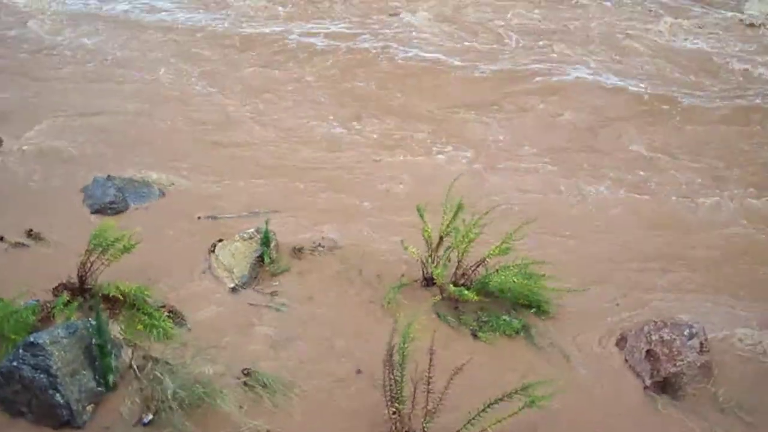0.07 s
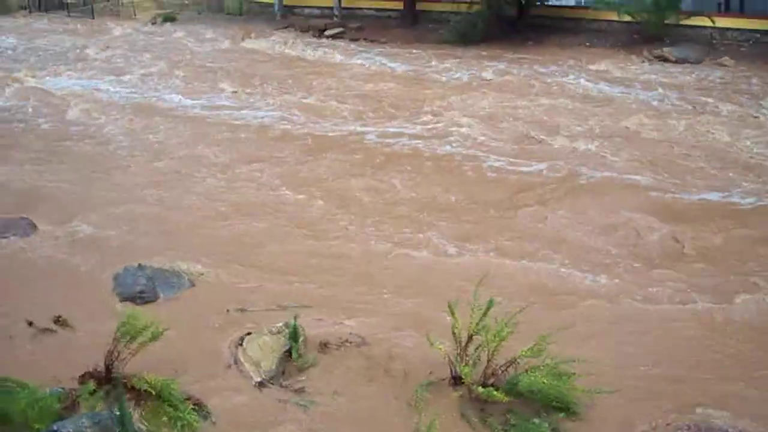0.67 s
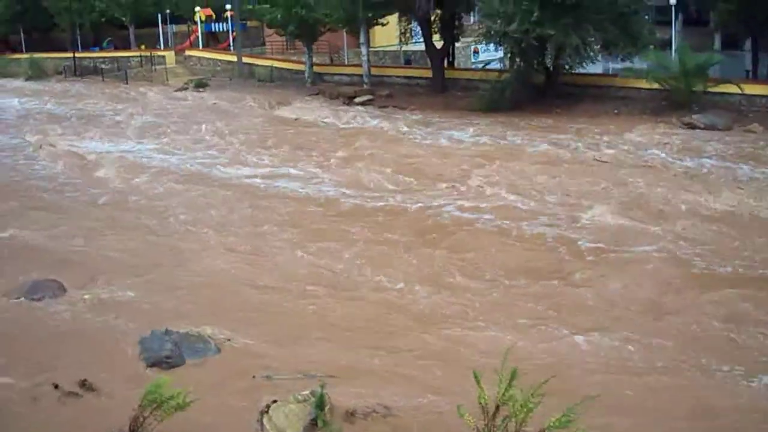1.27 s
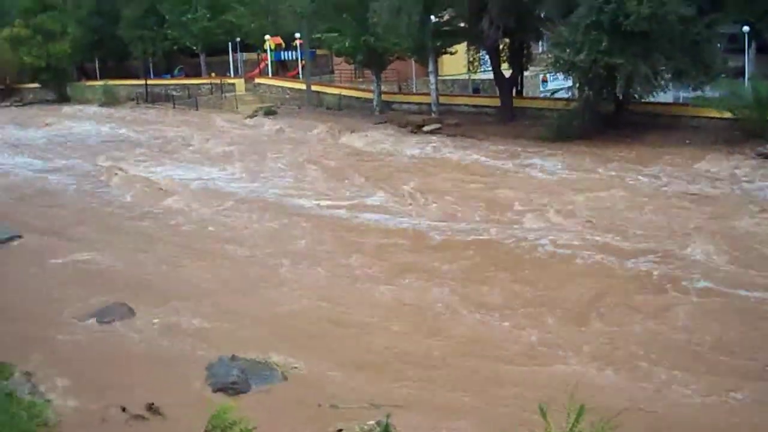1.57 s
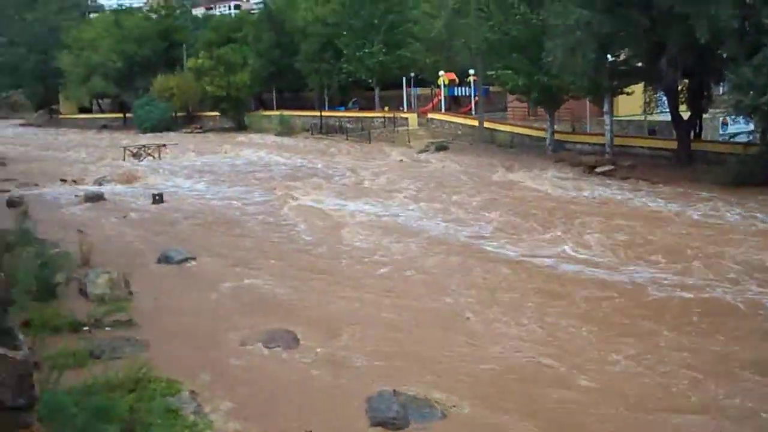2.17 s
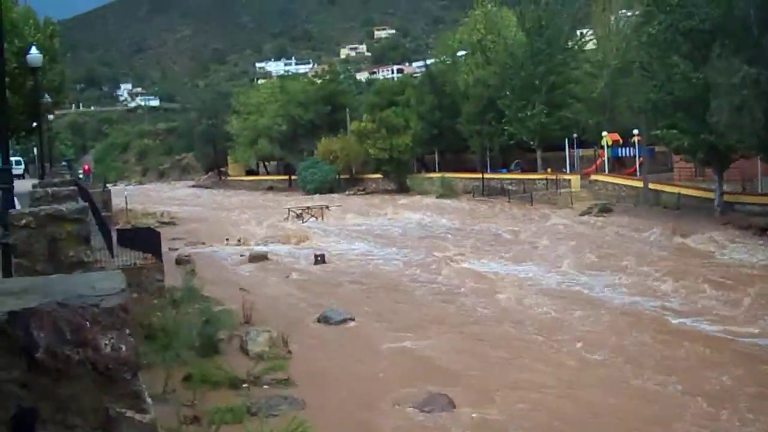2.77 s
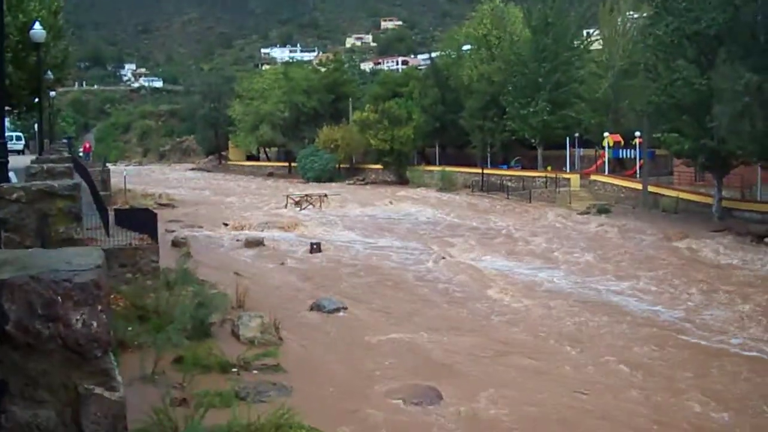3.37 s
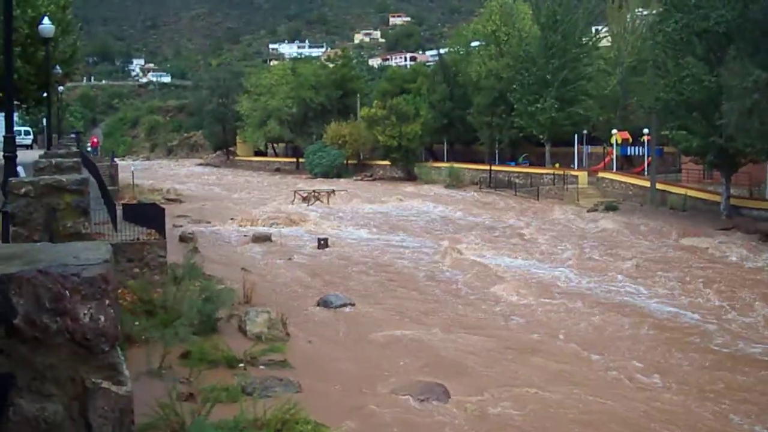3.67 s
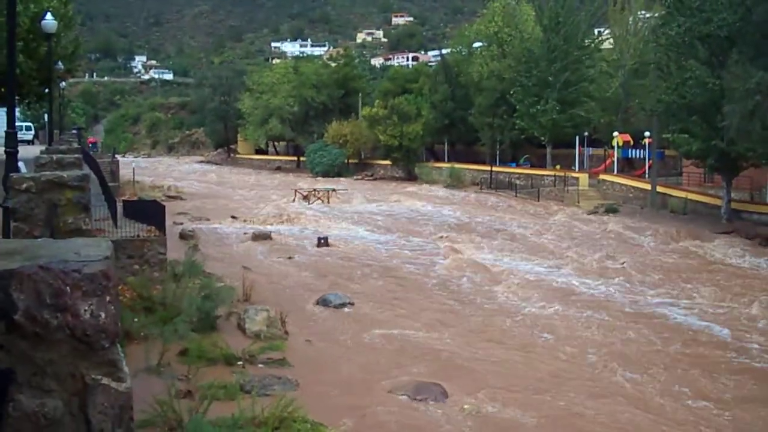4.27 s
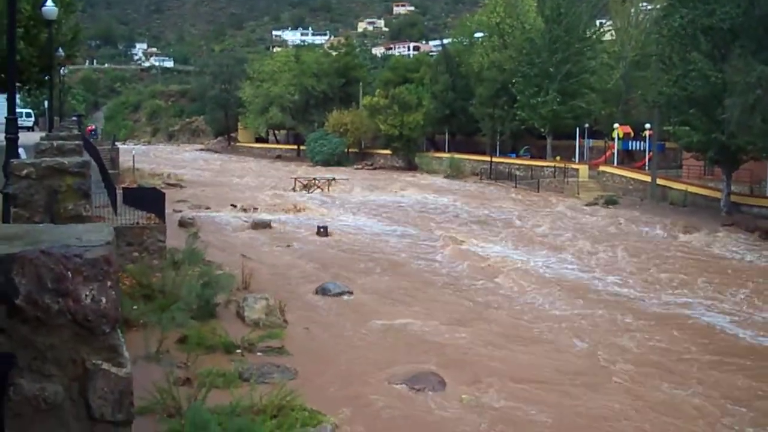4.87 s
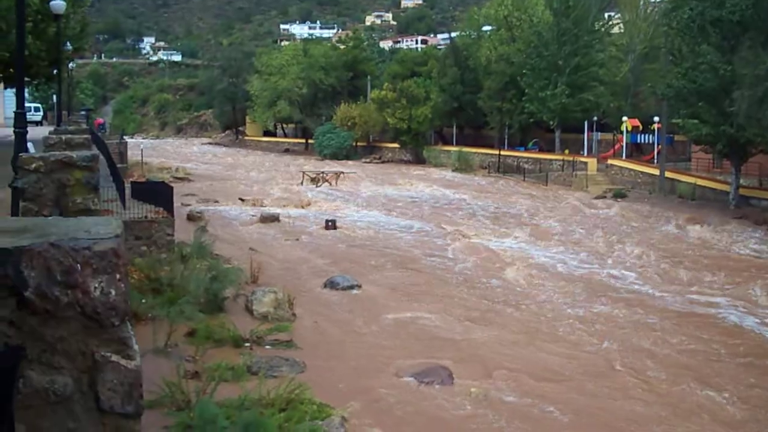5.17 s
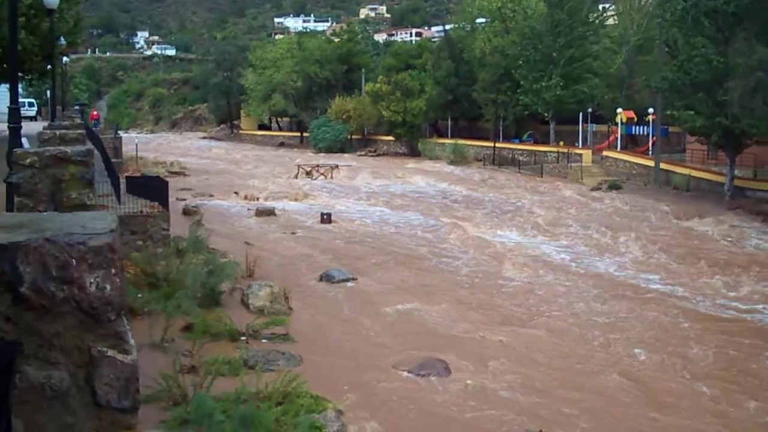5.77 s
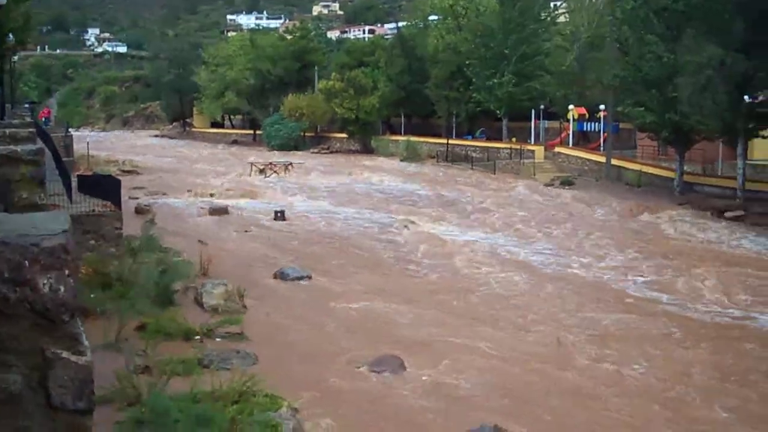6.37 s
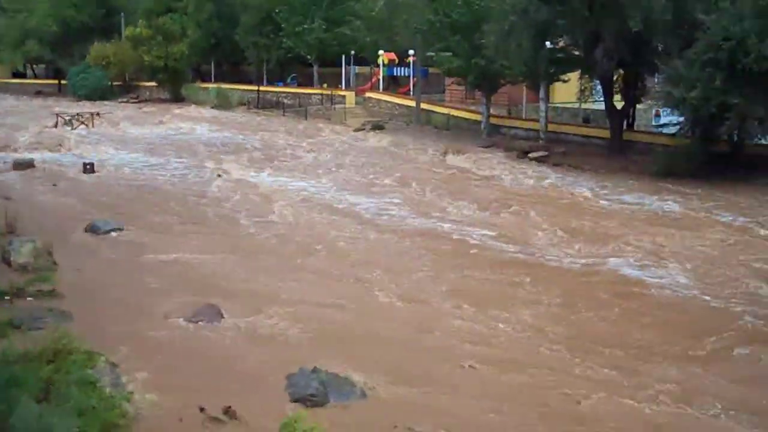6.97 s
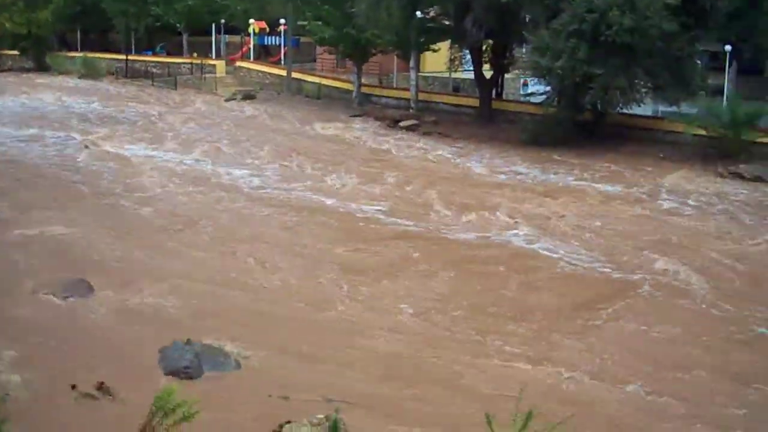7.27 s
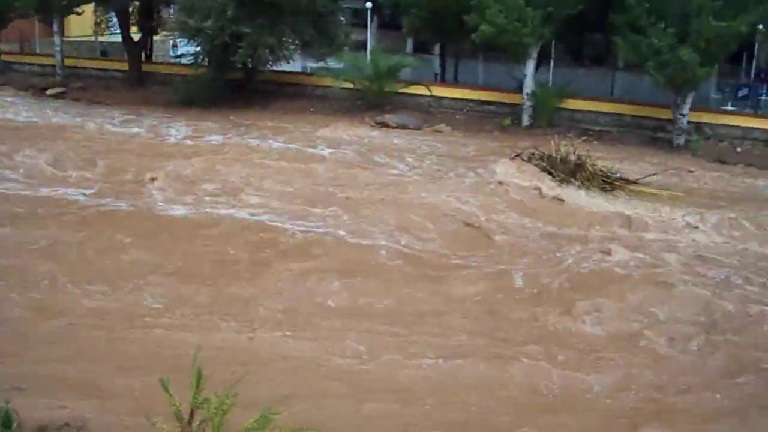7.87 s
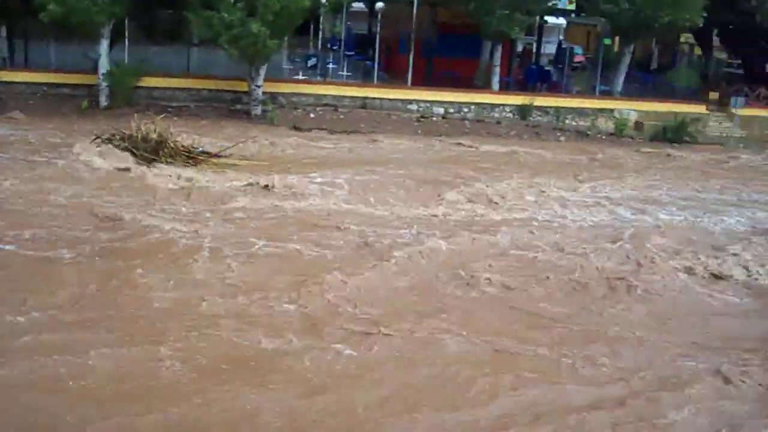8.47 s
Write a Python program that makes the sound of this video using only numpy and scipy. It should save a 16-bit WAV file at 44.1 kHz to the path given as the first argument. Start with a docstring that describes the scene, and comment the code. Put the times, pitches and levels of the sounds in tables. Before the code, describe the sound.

Heard from the bank, fast floodwater churns in one continuous wash with a faint gurgle. Gusts of wind add a low rumble and scattered dull thumps on the microphone. The buffeting grows stronger past the middle, and the river ducks for an instant after the biggest hits. The water's hiss brightens toward the end as the microphone faces the rapids.

```python
"""River in flood, with wind

Countless ringing bubbles merge into a steady roar, brighter when the microphone faces the rapids.
Wind rumbles on the microphone and single eddies thump against it.
The strongest eddies drive the limiter, so the river ducks and swells back."""
import sys
import numpy as np
from scipy import signal
from scipy.fft import rfft, irfft, next_fast_len
from scipy.io import wavfile

SR = 44100
rng = np.random.default_rng(int(sys.argv[2]) if len(sys.argv) > 2 else 0)


def generate_wav(sig):
    """Save sig (samples, or channels by samples) to the path in sys.argv[1] as 16-bit PCM at SR."""
    pcm = np.round(np.clip(np.atleast_2d(sig).T, -1, 1) * 32767).astype(np.int16)
    wavfile.write(sys.argv[1], SR, pcm)


N = 380583

# wind rumble: (frequency [Hz], relative density [dB])
RUMBLE_SPECTRUM = [(4, -17.5), (12, 6), (25, -0.5), (42, -3.5), (65, -9), (100, -18.5), (200, -27),
                   (400, -40), (1500, -79)]
# gusts: (peak time [s], level [dB], 1/e half-width of power [s])
WIND_GUSTS = [(.1, -23.5, .3), (1.05, -23.5, .25), (2.3, -19.5, .3), (4.45, -21.5, .17), (5.92, -18.5, .2),
              (7.1, -17.5, 0.63), (8.48, -19.5, .16)]
# eddies hitting the microphone: (time [s], level [dB], suction to push [s])
STRONG_EDDIES = [(.478, -7, 0.0023), (.587, -5, .012), (.962, -4, 0.0023), (1.044, -6, 0.0048),
                 (1.116, -6, .0035), (1.234, -7, 0.0027), (2.233, -8.5, 0.013), (4.871, 1, 0.0033),
                 (5.956, -1, .011), (5.973, 4, .012), (6.281, -6.5, .008), (6.34, -7, 0.0079),
                 (6.703, -4, .016), (7.075, -4, .016), (7.138, -0.5, .024), (7.507, -6.5, 0.0066),
                 (7.537, 6.5, .017), (7.75, -4.5, .012), (8.487, -5, 0.0053)]
# churning water: (frequency [Hz], relative density [dB])
WATER_SPECTRUM = [(40, -15), (100, -0.5), (170, -1), (260, 0.5), (350, -2.1), (490, -4.5), (720, -3),
                  (900, -6), (1250, -9), (1700, -9.5), (2300, -13.5), (4500, -19), (7300, -24.5),
                  (8400, -39)]
# microphone aim: (time [s], facing the rapids [0-1], tipped down at the rocks [0-1])
MIC_AIM = [(0, .35, .8), (1.4, .38, 1), (3, 0.16, 0.14), (4.2, .05, 0.02), (6, 0.07, .1), (7.45, 0.56, 0),
           (7.95, 0.94, .7), (8.63, 0.73, .2)]

LIGHT_AIR_DB, RIVER_DB, NEAR_BUBBLES_REL_DB = -25, -23, -9
SPRAY_AWAY_DB, SPRAY_FACING_DB = -0.68, 4.0
GURGLE_LEVEL_DB, GURGLE_TIPPED_DB = -0.2, 1.5


def from_db(db):
    """Decibels to gain."""
    return 10 ** (np.asarray(db) / 20)


def unit_rms(x):
    """Scale to rms 1."""
    return x / np.sqrt(np.mean(x ** 2) + 1e-20)


def coloured(x, spectrum):
    """Filter by a spectrum table, interpolated in log frequency; rms 1."""
    n_fft = next_fast_len(N, True)
    hz = np.fft.rfftfreq(n_fft, 1 / SR)
    knots_hz, knots_db = np.transpose(spectrum)
    gain_db = np.interp(np.log(hz + 1e-3), np.log(knots_hz), knots_db)
    return unit_rms(irfft(rfft(x, n_fft) * from_db(gain_db))[:N])


def butter(x, hz, kind, order=2):
    """Causal Butterworth filter."""
    return signal.sosfilt(signal.butter(order, hz, kind, fs=SR, output="sos"), x)


def drift(corner_hz):
    """Slow random wander: two-pole low-passed noise, rms 1."""
    hop, warmup = 100, 1000
    pole = np.exp(-2 * np.pi * corner_hz * hop / SR)
    white = rng.standard_normal(N // hop + warmup + 2)
    slow = signal.lfilter([1], [1, -2 * pole, pole * pole], white)[warmup:]
    return np.interp(np.arange(N) / hop, np.arange(len(slow)), unit_rms(slow))


def wind_strength():
    """Wind amplitude: bell-shaped gusts add their power to the light air."""
    t = np.arange(N) / SR
    gust_power = sum(from_db(db) ** 2 * np.exp(-((t - peak_s) / half_s) ** 2)
                     for peak_s, db, half_s in WIND_GUSTS)
    return np.sqrt(from_db(LIGHT_AIR_DB) ** 2 + gust_power)


def wind_rumble(wind, lumps_db=1.66, lumps_hz=6.5):
    """Turbulence at the microphone port: a lumpy low rumble."""
    lumps = from_db(lumps_db * drift(lumps_hz))
    return wind * lumps * coloured(rng.standard_normal(N), RUMBLE_SPECTRUM)


def weak_eddies(wind, per_s=2.5, over_wind_db=9.5, gap_s=.011, spread_octaves=.8):
    """Random eddies, more frequent and harder in stronger wind; rows as in STRONG_EDDIES."""
    chance, size = rng.random(N), rng.uniform(-1, 1, N)
    onsets = np.flatnonzero(chance < per_s * wind / wind.mean() / SR)
    return [(i / SR, 20 * np.log10(wind[i]) + over_wind_db, gap_s * 2 ** (spread_octaves * size[i]))
            for i in onsets]


def eddy_thumps(eddies, suction_ratio=0.89, sharpness=1.55, roughness=0.12, whirl_hz=330):
    """A passing eddy sucks at the diaphragm, then pushes harder; finer whirls roughen both peaks."""
    t, pressure = np.arange(N) / SR, np.zeros(N)
    for time_s, level_db, gap_s in eddies:
        near = np.abs(t - time_s) < .1
        position = 2 * (t[near] - time_s) / gap_s
        suction = np.exp(-sharpness * np.abs(position + 1))
        push = np.exp(-sharpness * np.abs(position - 1))
        pressure[near] += from_db(level_db) * (push - suction_ratio * suction)
    whirls = unit_rms(butter(rng.standard_normal(N), whirl_hz, "low", order=3))
    return pressure * (1 + roughness * whirls)


def far_wash(surge_db, churn_db=0.23, churn_hz=7.4):
    """Distant bubbles merge into noise; each size class swells slightly as waves fold over."""
    edges_hz = np.geomspace(40, 10000, 17)
    white = rng.standard_normal((2, N))
    bands = [butter(white[k % 2], band_hz, "band") * from_db(surge_db + churn_db * drift(churn_hz))
             for k, band_hz in enumerate(zip(edges_hz, edges_hz[1:]))]
    return coloured(sum(bands), WATER_SPECTRUM)


def near_bubbles(surge_db, per_s=5000, t60_cycles=17, spread_db=4):
    """Bubbles pinch off at the near rocks and ring; small, high ones are the most numerous."""
    pitches_hz = np.geomspace(250, 8000, 56)
    bubbles = np.zeros(N)
    for hz, share in zip(pitches_hz, pitches_hz / pitches_hz.sum()):
        onsets = np.flatnonzero(rng.random(N) < per_s * share / SR)
        levels_db = spread_db * np.minimum(rng.exponential(1, len(onsets)), 3)
        kicks = np.full(N, 1e-18)
        kicks[onsets] = from_db(levels_db) * rng.choice([-1, 1], len(onsets))
        pole = np.exp(-np.log(1000) * hz / (t60_cycles * SR))
        angle_rad = 2 * np.pi * hz / SR
        rings = signal.lfilter([1, -1], [1, -2 * pole * np.cos(angle_rad), pole * pole], kicks)
        bubbles += unit_rms(rings) * np.sqrt(hz)   # band covered widens with pitch
    return coloured(bubbles * from_db(surge_db), WATER_SPECTRUM)


def river(surge_depth_db=0.0, surge_hz=6.3, spray_hz=2200, gurgle_hz=260):
    """Steady roar of far and near bubbles; microphone aim weights the spray and gurgle bands."""
    aim_s, facing, tipped = np.transpose(MIC_AIM)
    t = np.arange(N) / SR
    spray_db = SPRAY_AWAY_DB + np.interp(t, aim_s, facing) * (SPRAY_FACING_DB - SPRAY_AWAY_DB)
    gurgle_db = GURGLE_LEVEL_DB + np.interp(t, aim_s, tipped) * (GURGLE_TIPPED_DB - GURGLE_LEVEL_DB)
    surge_db = surge_depth_db * drift(surge_hz)
    water = far_wash(surge_db) + from_db(NEAR_BUBBLES_REL_DB) * near_bubbles(surge_db)
    spray = butter(water, spray_hz, "high", order=1)
    gurgle = butter(water, [gurgle_hz / np.sqrt(2), gurgle_hz * np.sqrt(2)], "band", order=1)
    aimed = water + (from_db(spray_db) - 1) * spray + (from_db(gurgle_db) - 1) * gurgle
    return from_db(RIVER_DB) * aimed


def scene():
    """River and wind at one microphone."""
    wind = wind_strength()
    mix = river() + wind_rumble(wind) + eddy_thumps(list(STRONG_EDDIES) + weak_eddies(wind))
    return mix[None]


def limiter(x, threshold_db=-7.0, release_db_per_s=56, attack_s=0.0036):
    """Peaks over the threshold pull the gain down fast; it recovers at a steady rate."""
    over_db = np.maximum(20 * np.log10(np.abs(x) + 1e-9) - threshold_db, 0)
    ramp_db = release_db_per_s * np.arange(N) / SR
    held_db = np.maximum.accumulate(over_db + ramp_db, axis=-1) - ramp_db
    pole = np.exp(-1 / (attack_s * SR))
    reduction_db = signal.lfilter([1 - pole], [1, -pole], held_db)
    return x * from_db(-reduction_db)


def record(dry, clip_level=0.69, cutoff_hz=8500):
    """Limiter, soft clip of the peaks that slip through, steep low-pass."""
    limited = limiter(dry)
    rounded = limited / (1 + (limited / clip_level) ** 6) ** (1 / 6)
    return signal.sosfilt(signal.ellip(10, .1, 80, cutoff_hz, fs=SR, output="sos"), rounded)


dry = scene()
out = record(dry)
generate_wav(out)
```